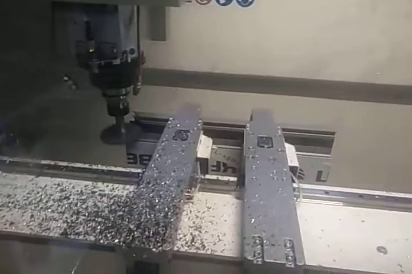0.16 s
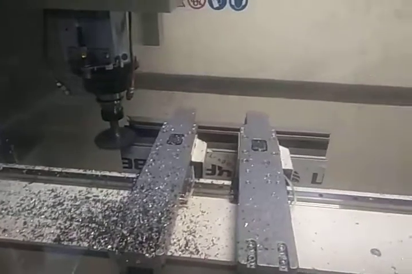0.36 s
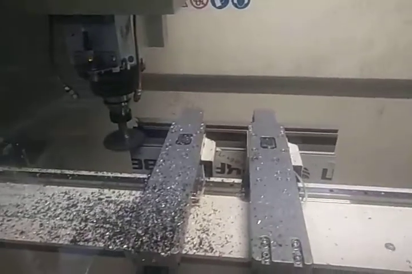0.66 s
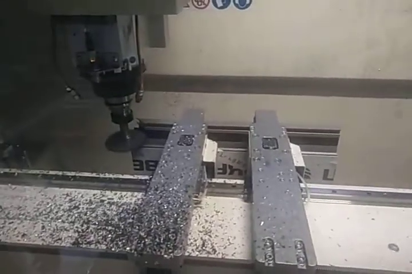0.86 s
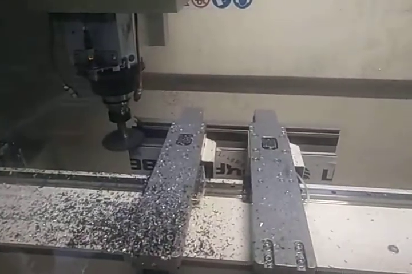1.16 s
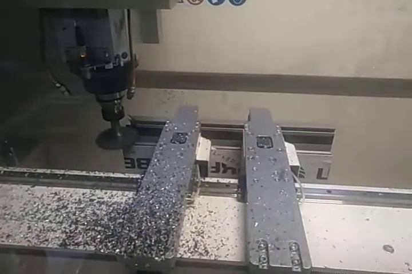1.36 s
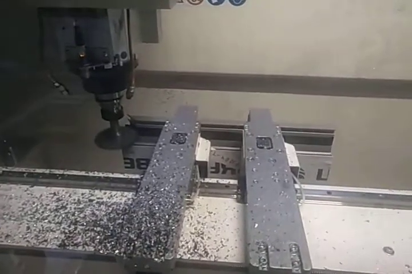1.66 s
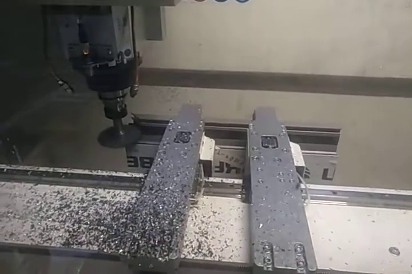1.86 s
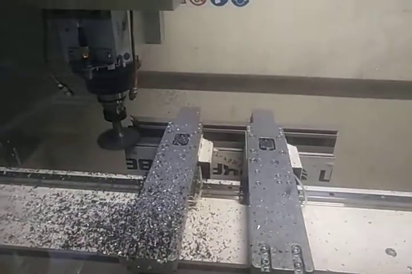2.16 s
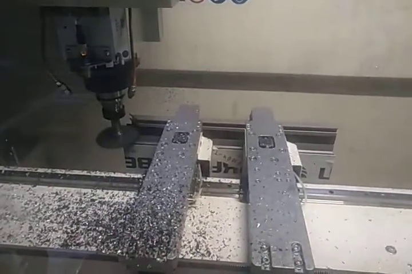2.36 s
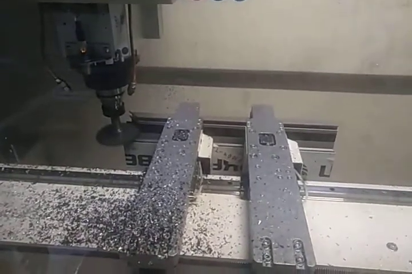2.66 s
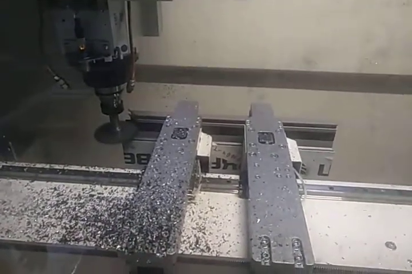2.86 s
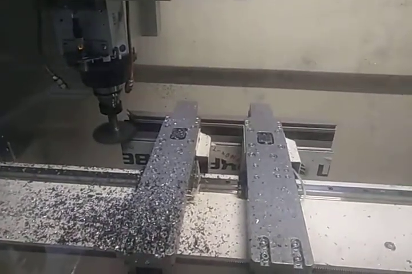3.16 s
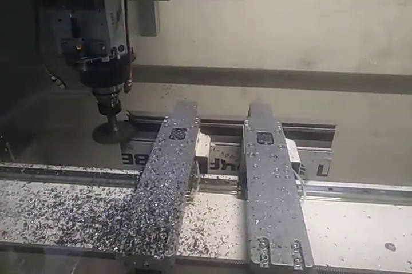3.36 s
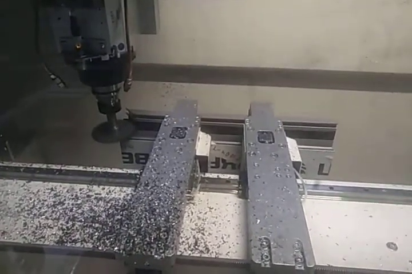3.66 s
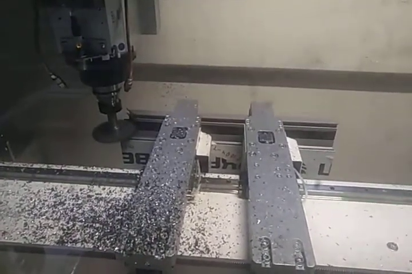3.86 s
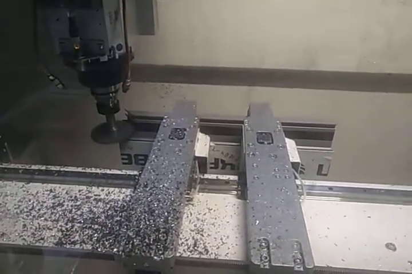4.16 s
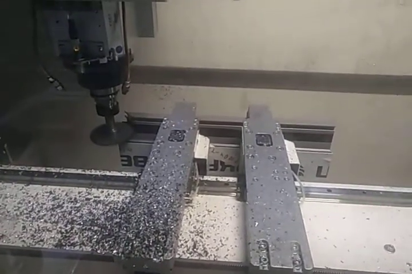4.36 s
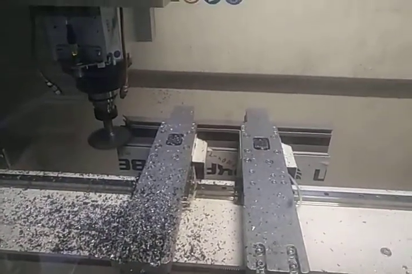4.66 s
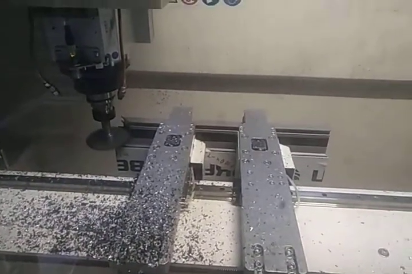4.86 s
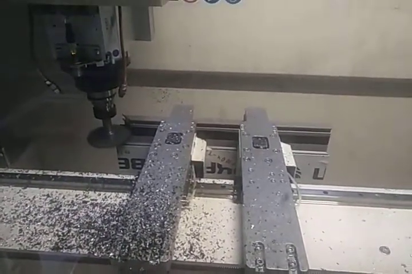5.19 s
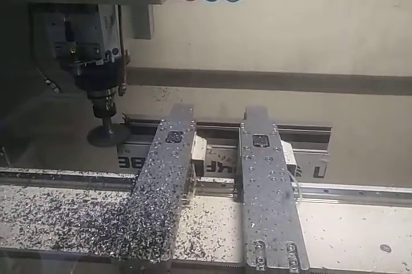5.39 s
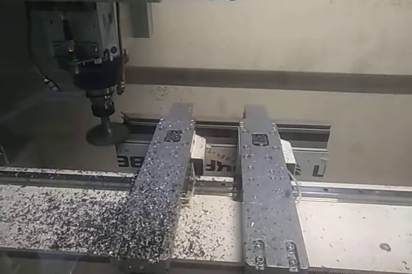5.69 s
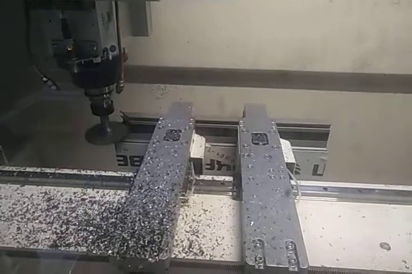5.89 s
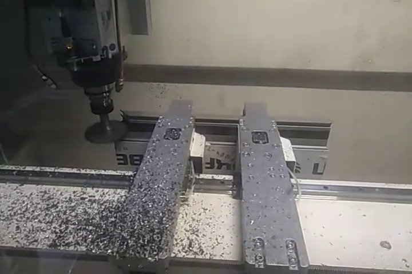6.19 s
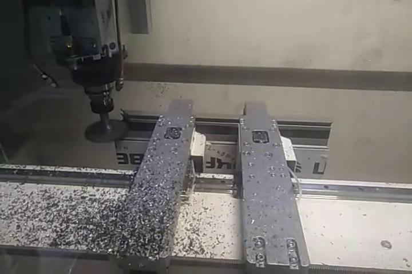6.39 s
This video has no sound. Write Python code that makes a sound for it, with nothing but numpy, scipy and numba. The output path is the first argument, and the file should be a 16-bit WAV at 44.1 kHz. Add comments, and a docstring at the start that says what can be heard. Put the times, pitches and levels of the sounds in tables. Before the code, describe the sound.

A toothed disc cutter whines through aluminium, one piercing tone near 2.8 kHz over machine hum and hall roar. Two soft air puffs come early. Around two seconds a neighbouring cutter rasps and squeals, then eases. After four seconds the cut deepens into a dense, buzzing scream with bright chip hiss; a strong air burst at 5.5 seconds leads into rougher rasping and squealing. Mono, evenly loud.

```python
"""In a workshop hall, an 18-tooth disc cutter on a steady spindle works through aluminium profiles.
Every turn repeats nearly the same rattle, so it whines in orders (multiples) of the shaft speed.
Chips hiss in shaped noise, a second cutter nearby rasps in noise and squeals in chopped tones, a mist nozzle
puffs in dying noise bursts, and a pump and a second spindle hum in sines over the roar of the hall.
A mono microphone with gain control holds the level."""
import sys
import numpy as np
from scipy import signal
from scipy.fft import rfft, irfft, next_fast_len
from scipy.io import wavfile
from scipy.ndimage import uniform_filter1d, map_coordinates
from numba import njit

SR = 44100
rng = np.random.default_rng(int(sys.argv[2]) if len(sys.argv) > 2 else 0)


def dump_mix(stems):
    """Bounce the given channels to the path in sys.argv[1] as a 16-bit WAV at rate SR."""
    frames = np.atleast_2d(stems).T  # one column per channel
    limited = np.clip(frames, -1, 1)  # hard clip at full scale
    pcm = np.round(limited * 32767).astype(np.int16)
    wavfile.write(sys.argv[1], SR, pcm)


N = 287973
T = np.arange(N) / SR  # seconds


def amp(db):
    """Decibels to an amplitude factor."""
    return 10 ** (np.asarray(db) / 20)


def unit(x):
    """Scale to an rms of 1."""
    return x / np.sqrt(np.mean(x ** 2) + 1e-20)


def along(points, hz):
    """Read (Hz, value) points on a log frequency axis."""
    f, v = np.transpose(points)
    return np.interp(np.log(hz + 1), np.log(f + 1), v)


def wobble(rate, size=N, per_s=SR):
    """A smooth random curve through `rate` random knots a second."""
    knots = rng.standard_normal(int(size * rate / per_s) + 4)
    return map_coordinates(knots, [np.arange(size) * rate / per_s])


def noise(spectrum, patchy_db):
    """Noise of rms 1, with random gain patches in time and frequency, coloured by a spectrum."""
    _, _, z = signal.stft(rng.standard_normal(N + 1024), SR, nperseg=512)
    field = uniform_filter1d(rng.standard_normal(z.shape), size=4, axis=0)
    field = uniform_filter1d(field, size=12, axis=1)
    patchy = signal.istft(z * amp(patchy_db * unit(field)), SR, nperseg=512)[1]
    m = next_fast_len(len(patchy))
    colour = amp(along(spectrum, np.fft.rfftfreq(m, 1 / SR)))
    return unit(irfft(rfft(patchy, m) * colour, m)[:N])


def control(rows):
    """An (s, dB) curve as gain per sample."""
    return amp(np.interp(T, *np.transpose(rows)))


SHAFT_HZ, TEETH = 83.312, 18
HUMP_OCTAVES = 0.21  # half-width of the hump in the weak orders, to 1/e of its dB
# Stages of the cut: thin wall, deep cut, break-out, second entry, wide face.
# Each row: start, full strength from, full strength until, end, all in seconds.
CUT_STAGES = [(-1, 0, 4.1, 4.18), (4.1, 4.18, 4.8, 5.15), (4.8, 5.15, 5.505, 5.52),
              (5.505, 5.52, 5.85, 5.98), (5.85, 5.98, 7, 8)]
# Orders not listed as loud scatter about this curve. Each row: frequency in Hz, level in dB before the rest.
WEAK_ORDERS = [(1200, -84), (1500, -35.5), (4000, -34.5), (9000, -31.5), (12000, -35), (15500, -41.5)]
# The weak orders, a row per stage: rise in dB, centre of a broad hump in Hz, hump height in dB.
WEAK_ORDER_RISE = [(0, 6170, 2), (1, 9400, 5.5), (3, 9700, 2), (3, 9800, -13), (3, 9750, -3)]
# Uneven teeth favour some orders between tooth multiples. One dB value per remainder of order / TEETH.
UNEVEN_TEETH = [5, 2, 1, -2, -2, -4, -3, 1, 1, 1, 2, 4, -1, -4, -4, -2, 2, 4]
# Loudest orders in the thin wall. Each row: shaft order, level in dB before the whine level.
THIN_WALL_ORDERS = [(18, -17), (27, -23), (32, -22), (34, -2), (36, -17), (46, -23), (51, -22), (67, -20),
                    (68, -19), (69, -12), (70, -21), (75, -22), (78, -21), (79, -19), (80, -19), (81, -22)]
# Loudest orders of the deep cut. Each row: shaft order, then levels in dB when buried and when breaking out.
DEEP_CUT_ORDERS = [(29, -13, -24), (32, -17, -23), (34, -19, -16), (35, -11, -17), (36, -5, -12),
                   (37, -13, -18), (38, -18, -25), (40, -16, -25), (46, -19, -15), (72, -22, -16),
                   (73, -30, -16), (89, -31, -16), (90, -18, -11), (97, -16, -21), (100, -17, -29),
                   (108, -17, -16), (110, -23, -19), (112, -21, -21), (115, -15, -13), (118, -20, -23),
                   (126, -15, -11), (145, -18, -17), (181, -26, -26)]
# Loudest orders of the wide face. Each row: shaft order, then levels in dB when entering and when buried.
WIDE_FACE_ORDERS = [(29, -12, -13), (34, -12, -14), (35, -15, -14), (46, -12, -19), (47, -18, -16),
                    (53, -9, -13), (54, -10, -17), (56, -17, -8), (62, -17, -14), (65, -17, -16),
                    (70, -15, -14), (72, -16, -17), (82, -23, -16), (108, -18, -21), (115, -19, -19),
                    (116, -17, -17), (126, -23, -18), (181, -30, -24)]
# Gain of the whole whine. Each row: time in seconds, gain in dB.
WHINE_LEVEL = [(0, -16), (1, -17), (2.3, -14.5), (3.4, -16.5), (4.08, -18), (4.2, -10), (4.45, -3),
               (5.1, -2), (5.45, -2), (5.58, -6), (5.8, -5.5), (6, -10.5), (6.3, -6.5), (6.53, -10)]


def whine(scatter_db=5.0, sway_db=3, drift=0.33, jitter=0.009, thin_uneven=0.19):
    """The pressure over one turn is rebuilt from slowly changing orders and read off at shaft speed."""
    frame_rate, turn = 50, 4096  # rebuilds per second, samples around one turn
    frames = int(N / SR * frame_rate) + 2
    order = np.arange(14, 190)
    order_hz = order * SHAFT_HZ

    # levels in dB, one row per stage
    uneven_share = np.append(thin_uneven, np.ones(len(CUT_STAGES) - 1))
    uneven = np.outer(uneven_share, np.take(UNEVEN_TEETH, order % TEETH))
    rise = np.array([db + hump_db * np.exp(-(np.log2(order_hz / centre_hz) / HUMP_OCTAVES) ** 2)
                     for db, centre_hz, hump_db in WEAK_ORDER_RISE])
    scatter = scatter_db * rng.standard_normal(uneven.shape)
    level = along(WEAK_ORDERS, order_hz) + uneven + rise + scatter
    for first_stage, table in [(0, THIN_WALL_ORDERS), (1, DEEP_CUT_ORDERS), (3, WIDE_FACE_ORDERS)]:
        for k, *db in table:
            level[first_stage:first_stage + len(db), round(k) - order[0]] = db

    # blend the stages in power
    frame_s = np.arange(frames) / frame_rate
    share = np.array([np.interp(frame_s, times, [0, 1, 1, 0]) for times in CUT_STAGES])
    size = np.sqrt(2 * share.T @ amp(level) ** 2)

    def slow(rate):
        """An independent smooth curve for every order."""
        return np.array([wobble(rate, size=frames, per_s=frame_rate) for _ in order]).T

    # the loudest orders hold steadiest
    sway = sway_db * np.clip(-share.T @ level / 20, 0, 1) * slow(2.996)
    # tooth timing errors blur high orders most (radians)
    blur = drift * slow(3.02) + jitter * order * slow(12)
    phase = rng.uniform(0, 2 * np.pi, len(order)) + blur
    spectrum = np.zeros((frames, turn // 2 + 1), complex)
    spectrum[:, order] = size * amp(sway) * np.exp(1j * phase)
    profile = irfft(spectrum, turn) * turn / 2
    profile = np.concatenate([profile, profile[:, :1]], axis=1)  # close the turn
    angle = T * SHAFT_HZ % 1 * turn
    return control(WHINE_LEVEL) * map_coordinates(profile, [T * frame_rate, angle], order=1)


# Chip hiss colour. Each row: frequency in Hz, relative level in dB.
CHIP_SPECTRUM = [(2000, -34), (2900, -3.5), (4700, -10), (6000, -3), (7500, -2.5), (8200, 0.5), (9000, -1),
                 (10500, -2), (12500, -7), (15700, -8)]
# Loudness of the chip hiss. Each row: time in seconds, level in dB before throb and flutter.
CHIP_LEVEL = [(0, -29), (2.1, -29), (2.2, -29), (2.28, -14), (2.37, -14), (2.45, -22), (3.18, -22),
              (3.3, -32), (3.7, -38), (4.08, -38), (4.2, -24), (4.45, -21), (4.75, -13), (5.1, -12),
              (5.5, -12), (5.58, -9), (5.68, -16), (5.78, -8), (5.87, -7), (5.9, -18), (6.1, -15),
              (6.53, -15.5)]


def chips():
    """Chips tear off and scatter; their hiss throbs a little with each turn."""
    throb = 1 + 0.15 * np.sin(2 * np.pi * SHAFT_HZ * T)
    flutter = amp(1.6 * wobble(30))
    return control(CHIP_LEVEL) * throb * flutter * noise(CHIP_SPECTRUM, patchy_db=2.2)


RINGS_ABOVE_HZ = 1550
# Rasp colour of the cutter nearby. Each row: frequency in Hz, relative level in dB.
RASP_SPECTRUM = [(600, -23), (1100, -10.5), (1500, -13), (1850, 2), (2150, -2.5), (2400, 0), (2750, -5),
                 (3150, -6.5), (3800, -4.5), (4300, -2), (5100, -8.5), (5800, -6), (6800, -11),
                 (9000, -35.5)]
# How hard that cutter bites. Each row: time in seconds, rasp level in dB.
BITE_LEVEL = [(0, -34), (1.7, -29), (2.18, -20.5), (2.3, -15.5), (2.5, -18), (3, -14), (3.2, -16),
              (3.5, -24), (3.8, -28), (4.3, -29), (4.7, -24), (5.3, -23), (5.46, -20), (5.62, -9),
              (5.93, -8.5), (6.1, -10), (6.53, -12)]
# The squeals start firm and break up. Each row: time in seconds, roughness from 0 to 1.
SQUEAL_ROUGHNESS = [(2.2, .1), (2.45, .2), (2.6, .42), (3.8, .42), (5.2, .35)]
# Chatter on one tone, chopped by the teeth into side tones. Each row: start, loudest and end in seconds,
# start and end pitch in Hz, spacing of side tones in Hz, level in dB before flicker,
# loss per side tone below and above in dB.
CHATTER_TONES = [(1.78, 1.95, 2.25, 2862, 2862, 225, -19, 2.5, 2.5),
                 (2.22, 2.38, 2.5, 2361, 2356, 590, -14, 4, 25),
                 (2.24, 2.34, 2.45, 4428, 4424, 295, -16, 8, 25),
                 (2.22, 2.35, 2.58, 7972, 7978, 590, -22, 15, 6),
                 (2.52, 2.75, 2.95, 1936, 1925, 300, -20, 0, 2),
                 (2.57, 2.7, 2.88, 3874, 3858, 285, -22, 15, 3),
                 (2.92, 3.2, 3.5, 1640, 1640, 297, -17, 25, 3),
                 (2.8, 3.1, 3.33, 4145, 4148, 316, -26, 15, 3),
                 (2.87, 3.2, 3.38, 3272, 3270, 297, -26, 25, 25),
                 (3.15, 3.25, 3.62, 1890, 1880, 298, -24, 25, 2),
                 (5.27, 5.55, 5.8, 2356, 2366, 295, -21, 4, 25),
                 (5.27, 5.35, 5.53, 7981, 7964, 295, -23, 25, 25),
                 (5.65, 5.75, 5.92, 1940, 1930, 298, -24, 4, 1),
                 (5.85, 6, 6.25, 1852, 1868, 298, -13, 25, 4),
                 (6.02, 6.25, 6.6, 1888, 1905, 298, -17, 25, 3),
                 (6.05, 6.3, 6.6, 4093, 4105, 292, -21, 2, 20),
                 (6.27, 6.4, 6.6, 1850, 1862, 300, -20, 25, 5)]


def second_cutter(flicker=18, edge_s=.04):
    """A rough rasp, and chatter tones that swell, flicker and fade, each with up to four side tones a side."""
    out = control(BITE_LEVEL) * noise(RASP_SPECTRUM, patchy_db=2.0)
    for start, top, end, hz0, hz1, spacing, db, below_db, above_db in CHATTER_TONES:
        a, b = round(start * SR), min(round(end * SR), N)
        t = T[a:b]
        rough = np.interp(t, *np.transpose(SQUEAL_ROUGHNESS))
        swell = np.interp(t, [start, start + edge_s, top, end - edge_s, end], [-25, -5, 0, -5, -25])  # dB
        cycles = np.cumsum(np.interp(t, [start, end], [hz0, hz1])) / SR
        for k in range(-4, 5):
            if hz0 + k * spacing < RINGS_ABOVE_HZ:  # the work does not ring this low
                continue
            # random amplitude and phase grow with roughness
            loose = wobble(flicker, size=b - a) + .6j * wobble(flicker, size=b - a)
            grip = 1 - rough + rough * loose
            loss = abs(k) * (below_db if k < 0 else above_db)
            tone = np.real(grip * np.exp(2j * np.pi * (cycles + k * spacing * t)))
            out[a:b] += np.sqrt(2) * amp(db - loss + swell) * tone
    return out


# Puffs of the mist nozzle. Each row: start in seconds, level of the burst in dB before its decay,
# time to fall 60 dB in seconds, narrowness of the gap from 0 to 1.
MIST_PUFFS = [(0.359, -13, 0.69, 0.15), (1.261, -11.5, 0.57, 0.13), (5.511, 1, 0.47, 0.24),
              (5.852, -11.5, .15, 0.4)]
# Lower colour of the jet. Each row: frequency in Hz, relative level in dB.
WIDE_GAP_SPECTRUM = [(2500, -41), (5000, -4.5), (7500, -1), (10000, -0.5), (13000, -12), (15700, -34)]
# Higher colour of the jet. Each row: frequency in Hz, relative level in dB.
NARROW_GAP_SPECTRUM = [(7000, -36), (11000, -6), (13000, 13), (15700, -8)]


def nozzle(spit_db=5, spit_t60=0.03):
    """Each valve stroke spits, then lets out a burst of air that dies away; a narrow gap hisses higher."""
    low = noise(WIDE_GAP_SPECTRUM, patchy_db=2)
    high = noise(NARROW_GAP_SPECTRUM, patchy_db=2)
    out = 0
    for start, db, t60, narrow in MIST_PUFFS:
        age = np.maximum(T - start, 0)
        burst = amp(-60 * age / t60)
        spit = amp(spit_db - 60 * age / spit_t60)
        onset = 1 - np.exp(-age / .001)
        out = out + amp(db) * (burst + spit) * onset * ((1 - narrow) * low + narrow * high)
    return out


def drone(hz, orders, sway_db):
    """Slightly unsteady orders of a rotating machine: sines at multiples of its speed, swaying in level and phase."""
    out = 0
    for k, db in orders:
        level = np.sqrt(2) * amp(db + sway_db * wobble(5))
        phase = rng.uniform(0, 2 * np.pi) + 0.47 * wobble(6)
        out = out + level * np.sin(2 * np.pi * round(k) * hz * T + phase)
    return out


PUMP_HZ, SECOND_SPINDLE_HZ = 48.89, 74.95
# Pump hum. Each row: order of the pump speed, level in dB before sway.
PUMP_ORDERS = [(1, -47.5), (2, -52.5), (3, -45), (4, -38), (5, -35), (6, -23.5), (7, -39.5), (12, -36),
               (24, -48)]
# Second spindle hum. Each row: order of that spindle's speed, level in dB before sway and fade.
SECOND_SPINDLE_ORDERS = [(6, -32), (9, -40.5), (10, -53), (12, -41), (15, -47.5), (18, -38.5), (21, -42),
                         (24, -44.5), (27, -38), (28, -38), (30, -36)]
# The second spindle hum drops back late. Each row: time in seconds, gain in dB.
SECOND_SPINDLE_GAIN = [(5.2, 0), (5.8, -10)]
# Roar of the hall. Each row: frequency in Hz, relative level in dB.
HALL_SPECTRUM = [(20, -40), (60, -20.5), (90, -12), (135, -16.5), (190, -3.5), (280, -5), (420, -7),
                 (600, -10), (850, -13.5), (1200, -14.5), (1600, -15.5), (2500, -13.5), (3500, -15.5),
                 (6000, -32)]
# Compressed air. Each row: frequency in Hz, relative level in dB.
AIR_SPECTRUM = [(1500, -18), (3000, -6), (6000, -10), (10000, 8), (13000, -18), (15700, 23)]


def shop():
    """Pump and second spindle in sines, the broad roar of the hall and a steady hiss of compressed air in noise."""
    pump = drone(PUMP_HZ, PUMP_ORDERS, sway_db=1.5)
    spindle_hum = drone(SECOND_SPINDLE_HZ, SECOND_SPINDLE_ORDERS, sway_db=1.0)
    second_spindle = control(SECOND_SPINDLE_GAIN) * spindle_hum
    roar = amp(-25.5) * noise(HALL_SPECTRUM, patchy_db=1.5)
    air = amp(-33) * noise(AIR_SPECTRUM, patchy_db=4)
    return pump + second_spindle + roar + air


def scene():
    """All sources at the one microphone, the same in both channels."""
    mono = whine() + chips() + second_cutter() + nozzle() + shop()
    return np.array([mono, mono])


@njit
def follow(power, attack, release):
    """A level detector that rises fast and falls slowly."""
    out, level = np.empty_like(power), power[:2000].mean()
    for i in range(len(power)):
        level += (attack if power[i] > level else release) * (power[i] - level)
        out[i] = level
    return out


TOP_HZ = 15730  # band limit of the microphone signal


def record(dry, hold_db=-13, slope=1.0, attack_s=0.0005, release_s=0.055):
    """Gain control pulls loud and quiet passages to one level; nothing passes above the band limit."""
    power = np.abs(uniform_filter1d(dry[0] ** 2, size=88))  # 2 ms average
    level_db = 10 * np.log10(follow(power, 1 / (attack_s * SR), 1 / (release_s * SR)))
    held = dry * amp(-slope * (level_db - hold_db))
    m = next_fast_len(N + 4096)
    passband = np.fft.rfftfreq(m, 1 / SR) < TOP_HZ
    return irfft(rfft(held, m) * passband, m)[:, :N]


dry = scene()
out = record(dry)
dump_mix(out)
```